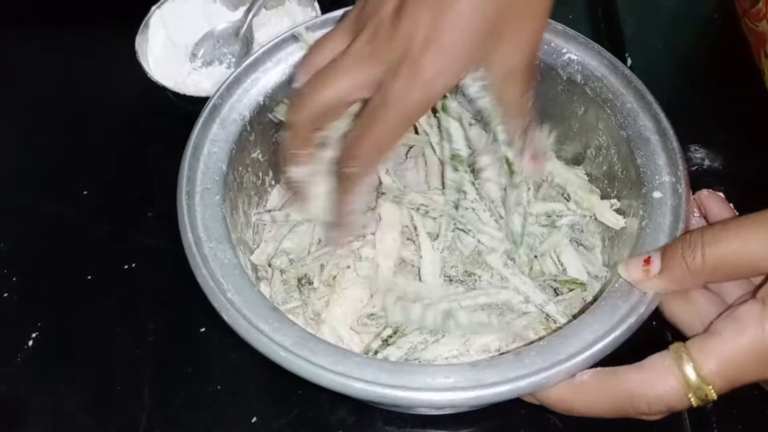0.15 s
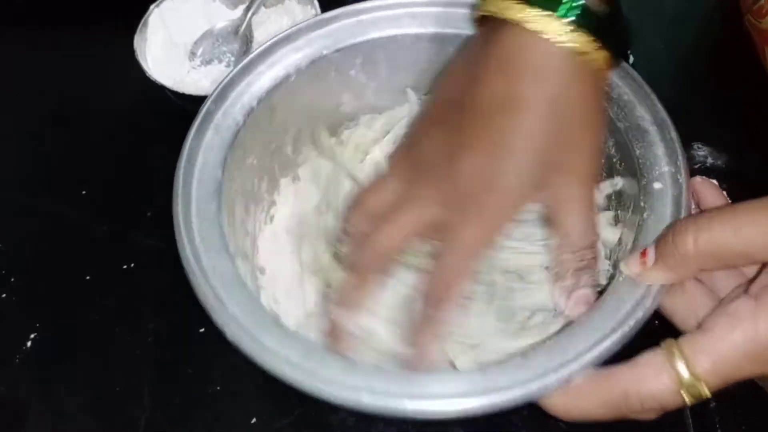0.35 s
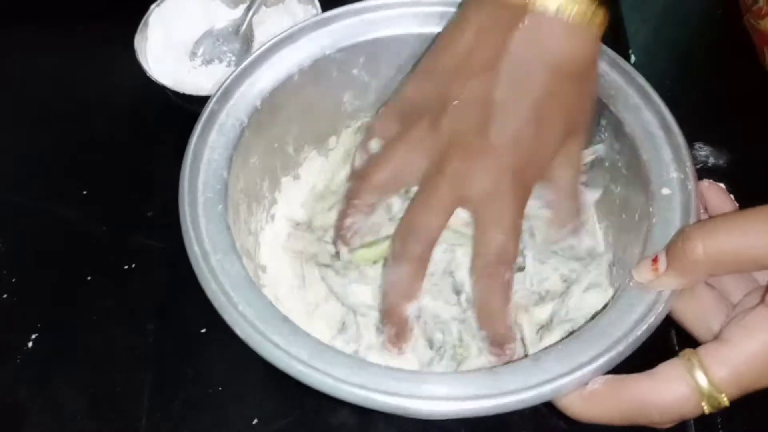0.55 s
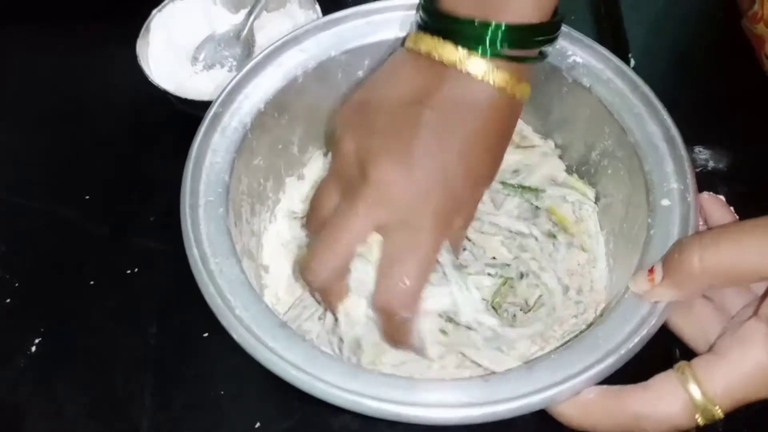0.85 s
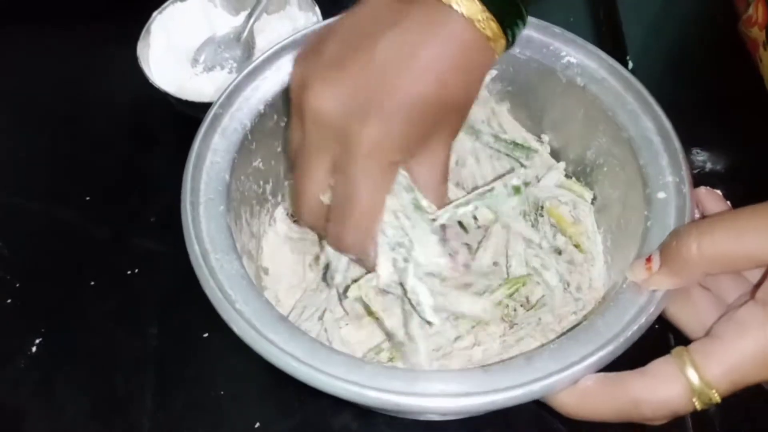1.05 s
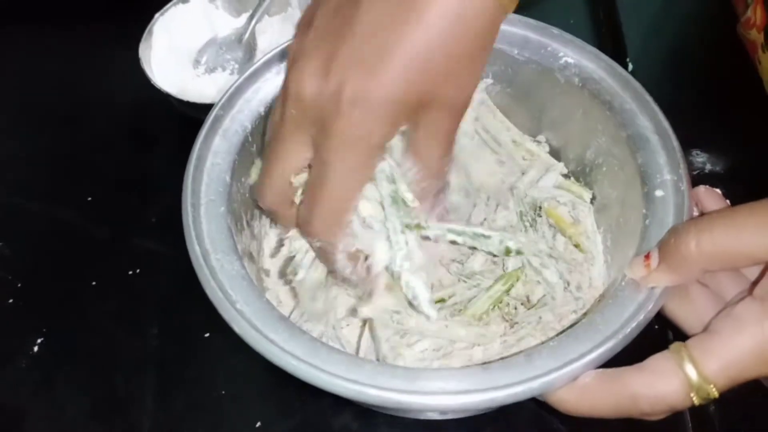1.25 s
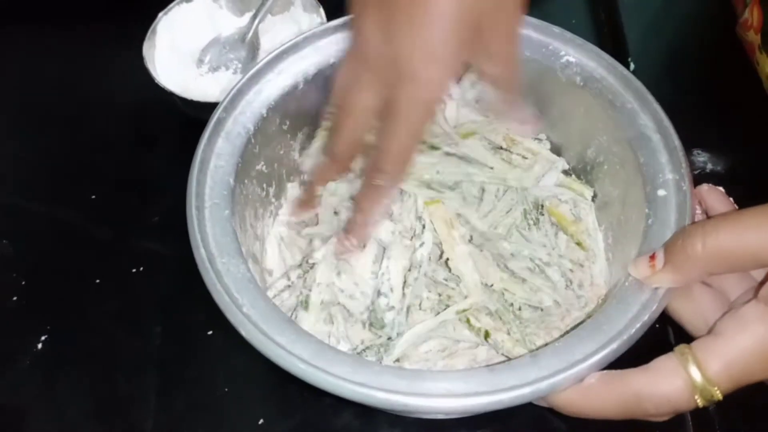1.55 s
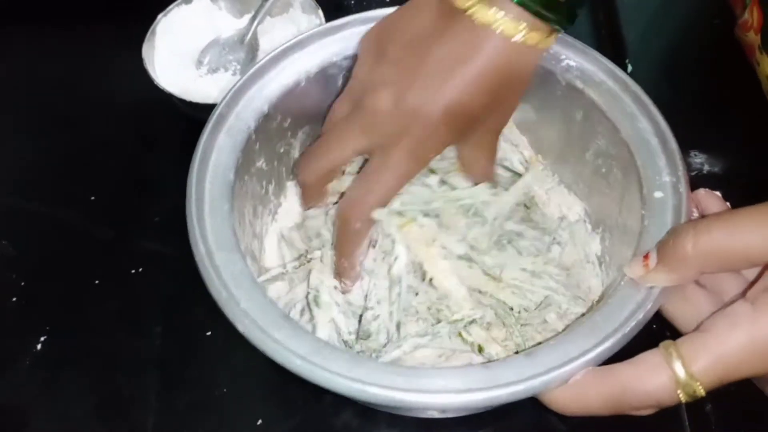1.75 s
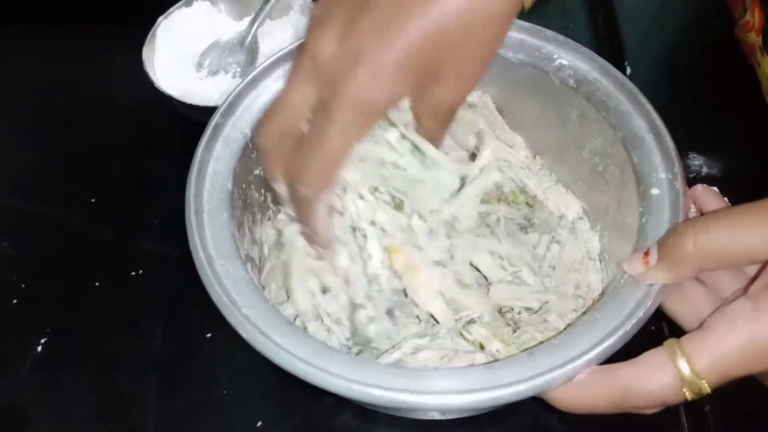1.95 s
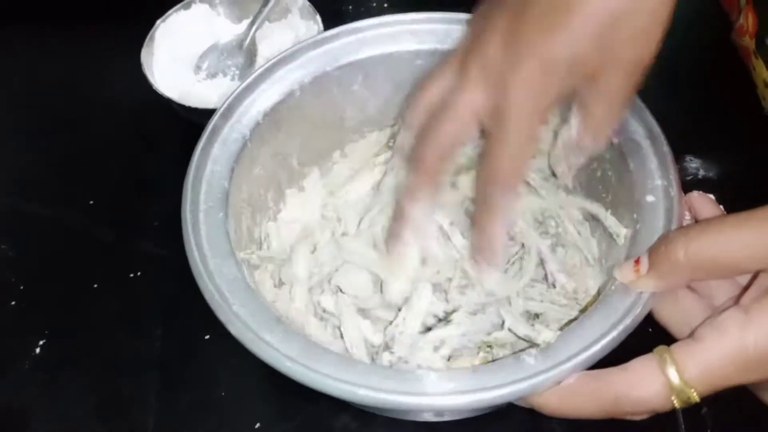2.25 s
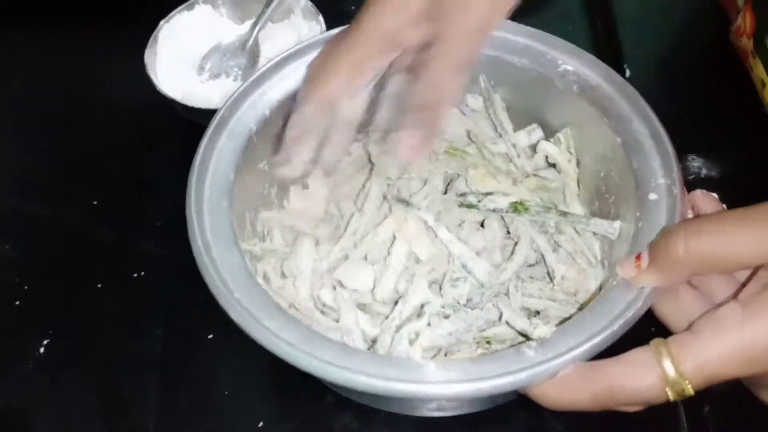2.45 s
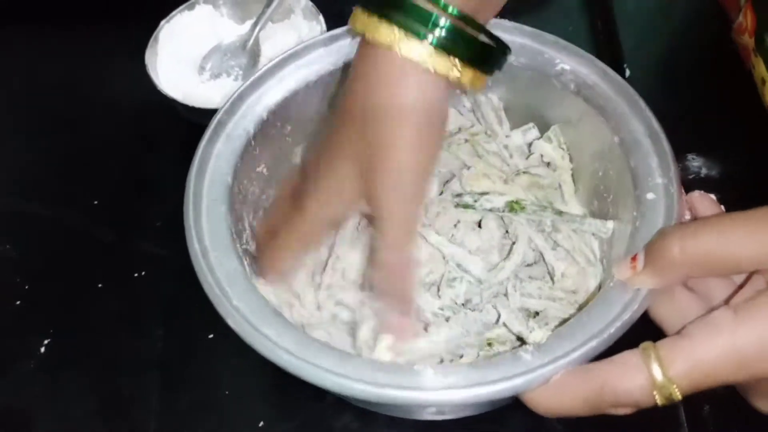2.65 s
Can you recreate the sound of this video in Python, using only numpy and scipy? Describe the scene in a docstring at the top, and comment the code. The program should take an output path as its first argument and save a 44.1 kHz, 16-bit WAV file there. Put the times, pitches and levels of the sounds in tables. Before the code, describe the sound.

A hand turns floured vegetable strips in a metal bowl: gritty rustling and crunching in bursts, sharp damped wall knocks, a brief glass bangle chink, then lighter strokes; close stereo microphones, small hard kitchen, faint hiss.

```python
"""Floured vegetable strips rustle and crunch as a hand turns them in a metal bowl: gritty noise and short
pitched rings, shaped band by band. Nails and bangles knock the bowl wall (noise bursts into damped modes),
glass bangles chink (brief modes), the bowl thuds (low damped overtones), and short tones add bowl rings,
ticks, scrapes and crackles. A small hard room (sparse dying taps) answers the hits, over a faint hiss
(shaped noise) and wavering tone."""
import sys
import numpy as np
from scipy import signal
from scipy.io import wavfile
from scipy.ndimage import uniform_filter1d

SR = 44100
rng = np.random.default_rng(int(sys.argv[2]) if len(sys.argv) > 2 else 0)


def unload_audio(sound):
    """Save the sound as a 16-bit wav file, at the path given as the first command line argument."""
    columns = np.transpose(np.atleast_2d(sound))
    # keep every value between -1 and 1, then stretch to whole-number steps
    steps = np.round(np.clip(columns, -1, 1) * 32767)
    wavfile.write(sys.argv[1], SR, steps.astype(np.int16))


def linear_from_db(decibels):
    """Turn decibels (scalar or array-like) into linear amplitude factors; 0 gives 1."""
    return 10 ** (np.asarray(decibels, float) / 20)


N = 123479  # samples

# Stirring of the strips. Each row: time in seconds, then level in dB of body, crunch, scrape, flour hiss
# and top fizz, the five bands parted by BAND_EDGES_HZ.
STIR_LEVELS = [(0.029, -78, -86, -86, -66, -80), (.055, -75, -65.5, -47, -44.5, -52),
               (0.128, -82, -71, -59, -50.5, -59), (0.157, -68, -52, -50.5, -44.5, -52.5),
               (.24, -58.5, -49, -47, -43, -48.5), (0.383, -54, -58, -53, -53, -58),
               (0.452, -42.5, -37.5, -51, -45, -56), (0.622, -64, -45, -42, -53, -53),
               (0.739, -73, -55, -53, -50, -59), (0.798, -78, -51.5, -49, -53, -40.5),
               (0.981, -83, -94, -79, -67, -79.5), (1.109, -89, -74, -67.5, -66, -78.5),
               (1.22, -78.5, -83.5, -73, -68, -78.5), (1.422, -78, -86.5, -87, -68, -82),
               (1.437, -72.5, -72, -59, -45, -51.5), (1.50, -69, -68.5, -53.5, -52.5, -55),
               (1.604, -47.5, -37.5, -43, -42.5, -51), (1.749, -68, -50, -54.5, -60, -76),
               (1.9, -75, -80.5, -85, -73, -82), (2.016, -98, -94, -76, -65, -83.5),
               (2.028, -66, -62.5, -44, -59, -65), (2.075, -67, -54, -57, -64, -73),
               (2.15, -63, -62.5, -60, -59, -69.5), (2.269, -80, -77.5, -80, -70, -81),
               (2.343, -60, -66, -59.5, -47, -52.5), (2.386, -89, -73, -62, -58.5, -63),
               (2.429, -44, -47, -47, -39, -48), (2.552, -59, -50.5, -49.5, -41.5, -50),
               (2.621, -84, -57.5, -51.5, -45.5, -54), (2.718, -64, -57.5, -57, -55, -61),
               (2.8, -101, -79.5, -73, -63.5, -80)]
# Borders of the stir bands and of the bowl mode groups. Each entry: frequency in Hz.
BAND_EDGES_HZ = [600, 3000, 5300, 8600]
# Rustle spectrum within the bands. Each row: frequency in Hz, relative density in dB per Hz.
RUSTLE_SPECTRUM = [(60, -15.5), (172, -28), (344, -18.5), (516, -44), (709, -11.5), (3390, -11), (6860, 2),
                   (9340, -4), (15500, 0.5), (15900, -51.5)]
# Knocks on the bowl wall. Each row: start in seconds, peak of the high modes in dB, then low modes,
# middle modes and top modes in dB against it.
WALL_KNOCKS = [(0.398, -13, -3.5, 0.5, -16), (0.4036, -16.5, 1.5, -1.5, -20), (.423, -10.5, -20, -10, -32),
               (.481, -12, 2, -5.5, -9.5), (0.5514, -10, -18.5, -11.5, -30), (0.5744, -9.5, -17, -11, -28),
               (0.7522, -12, -10.5, -6.5, -15.5), (.7945, -26, -25, -29, -12.5),
               (1.5245, -18.5, 4.5, 2, -31.5), (1.532, -19, 2, 3, -25), (1.6232, -17.5, -12, -13.5, -20.5),
               (1.6413, -17.5, -7, -5, -21.5), (1.7196, -43, 17, -13, -19)]
# Bowl modes. Each row: frequency in Hz, relative level in dB, t60 in seconds before the LONGEST_RING_S cap.
BOWL_MODES = [(749.6, -1, 0.18), (1178, -10.5, 0.016), (1686, 16, 0.036), (2001, 16, 0.052),
              (2444, 15.5, 0.021), (2735, 9.5, 0.09), (3820, -0.5, 0.067), (4092, 3.5, 0.019),
              (4505, -3, 0.045), (6320, 4, 0.081), (6844, 13.5, 0.0129), (7352, 4.5, 0.03),
              (11520, -5, 0.00607)]
# Bangle chinks. Each row: start in seconds, peak in dB.
BANGLE_CHINKS = [(0.7704, -21.5), (0.776, -32.5), (0.7896, -32), (0.7968, -18.5)]
# Glass modes. Each row: frequency in Hz, relative level in dB, t60 in seconds before the LONGEST_RING_S cap.
GLASS_MODES = [(5990, -5, 0.037), (7140, -18.5, 0.076), (10190, 1, .05), (10500, -9, 0.027),
               (15600, 5, 0.029)]
# Thuds of the bowl and of falling strips. Each row: start in seconds, peak in dB, pitch in Hz,
# t60 of the fundamental in seconds.
SOFT_THUDS = [(0.28, -23, 370, 0.026), (0.399, -31.5, 255.5, 0.093), (0.479, -36, 316, 0.062),
              (1.54, -37, 183, 0.072), (1.689, -61, 149, 0.019), (2.3074, -34.5, 163, 0.045),
              (2.415, -36, 180, 0.051)]
# Thud overtones. Each row: multiple of the pitch, relative level in dB.
OVERTONES = [(1, 0), (1.35, -3), (2.3, -7), (3.5, -14)]
# Short tones: bowl rings, knock and thud tones, ticks, scrapes and crackles. Each row: start in seconds,
# level before edge and wobble in dB, pitch in Hz, t60 in seconds.
SHORT_TONES = [ (0.052, -39, 4170, 0.04), (0.223, -30.5, 2560, 0.025), (0.228, -32, 2960, 0.037),
               (0.277, -29.5, 1200, 0.023), (1.029, -50.5, 780, 0.11), (1.03, -52.5, 532, 0.11),
               (1.066, -62.5, 2130, 0.23), (1.106, -58, 1618, 0.12), (1.324, -53, 2957, 0.08),
               (1.453, -52, 1190, 0.062), (1.72, -50, 435, 0.65), (1.72, -47, 712, 0.5),
               (.753, -33, 1625, .22), (1.04, -63, 2790, .7), (.149, -35, 4420, .035),
               (2.032, -35, 677, 0.053), (2.032, -42.5, 448, 0.059), (2.44, -20.5, 7120, 0.016),
               (2.0203, -26.5, 3400, .016), (2.0205, -31, 3750, .014), (2.0697, -27, 1250, .012),
               (2.0697, -31, 2200, .01), (2.073, -32, 1150, .014), (2.111, -38, 1644, 0.038)]
# Hiss spectrum. Each row: frequency in Hz, relative density in dB per Hz.
HISS_SPECTRUM = [(30, -38.5), (110, -5.5), (270, -25), (622, -34), (1360, -17), (3230, -37.5), (4190, -14),
                 (5170, -38.5), (6210, 1), (7460, -9), (8950, -40.5), (15500, -36.5)]
# Room decay. Each row: frequency in Hz, t60 in seconds.
ROOM_DECAY = [(250, 0.32), (1000, 0.2), (4000, 0.37), (15000, 0.27)]
# Microphone pair balance. Each row: frequency in Hz, left minus right in dB.
LEFT_RIGHT_BALANCE = [(300, 1.5), (1200, 6.5), (3000, 3), (6500, 1.5), (8300, -12), (11000, -15.5),
                      (12500, 1), (15000, -4)]
# Microphone pair likeness. Each row: frequency in Hz, cosine of the rms left-right phase difference.
LEFT_RIGHT_LIKENESS = [(200, 0.74), (5000, 0.74), (9500, 0.37), (15000, 0.22)]

GRAINS_PER_S, GRAIN_DECAY_S, GRAIN_SPREAD_DB = 1100, 0.0058, 5
SMOOTH_SHARE, PATCHY_DB = 0.49, 0.5
CRUNCHES_PER_S, CRUNCH_T60_S, CRUNCH_DB = 45, 0.03, -2.5  # rate for each pitch, level against the grit
WALL_DB, WALL_T60_S = 7, 0.06
MODE_SCATTER_DB, DETUNE, CRACK_DB = 2.5, 0.01, -3
CONTACT_S, RATTLE_S, RATTLE_DB = 0.0008, 0.0047, -4.5
LONGEST_RING_S = 0.034  # the load of strips damps the modes
GLASS_SCATTER_DB, GLASS_ATTACK_S = 4, 0.00054
WOBBLE_S, WOBBLE_DEPTH = 0.02, 0.72
HISS_RMS_DB, HISS_PATCHY_DB = -61, 2.6
WHINE_HZ, WHINE_WIDTH_HZ, WHINE_RMS_DB = 4190, 60, -74
ROOM_DB, ROOM_GAP_S = -7, 0.0043
LOW_CUT_HZ = 144


def evened(x):
    """Scales to an rms of 1."""
    return x / np.sqrt(np.mean(x ** 2) + 1e-20)


def read(points, hz):
    """Reads a table of (Hz, value) along log frequency."""
    f, value = np.transpose(points)
    return np.interp(np.log(hz + 1), np.log(f + 1), value)


def add(mix, start_s, sound):
    """Adds a sound in place, cut at the end of the mix."""
    part = mix[round(start_s * SR):][:len(sound)]
    part += sound[:len(part)]


def peaked(x, db):
    """Scales to a peak in dB."""
    return linear_from_db(db) * x / np.abs(x).max()


def ring(hz, db, t60_s, t):
    """One exponentially dying mode per row."""
    return linear_from_db(db[:, None] - 60 * t / t60_s[:, None]) * np.sin(2 * np.pi * hz[:, None] * t)


def filtered(x, order, hz, kind):
    """Butterworth filter."""
    return signal.sosfilt(signal.butter(order, hz, kind, fs=SR, output="sos"), x)


def patches(shape, bins, frames):
    """A random field over frequency and time with an rms of 1, smoothed over bins and frames."""
    across = uniform_filter1d(rng.standard_normal(shape), bins, 0)
    return evened(uniform_filter1d(across, frames, 1))


def hiss():
    """Shaped noise with a patchy level, plus narrow-band noise heard as a faint wavering tone."""
    hz, _, z = signal.stft(rng.standard_normal(N), SR, nperseg=1024, noverlap=768)
    z = z * linear_from_db(read(HISS_SPECTRUM, hz)[:, None] + HISS_PATCHY_DB * patches(z.shape, 24, 5))
    noise = evened(signal.istft(z, SR, nperseg=1024, noverlap=768)[1][:N])
    band_hz = [WHINE_HZ - WHINE_WIDTH_HZ / 2, WHINE_HZ + WHINE_WIDTH_HZ / 2]
    whine = evened(filtered(rng.standard_normal(N), 2, band_hz, "band"))
    return linear_from_db(HISS_RMS_DB) * noise + linear_from_db(WHINE_RMS_DB) * whine


def room(x):
    """Sparse reflections of random sign, each band dying at its own speed."""
    slots = np.arange(round(ROOM_GAP_S * SR), SR - 20, 20)
    taps = np.zeros(SR)
    taps[slots + rng.integers(0, 20, len(slots))] = rng.choice([-1., 1.], len(slots))
    hz, t, z = signal.stft(taps, SR, nperseg=256)
    z = z * linear_from_db(-60 * t / read(ROOM_DECAY, hz)[:, None])
    tail = signal.istft(z, SR, nperseg=256)[1]
    return signal.fftconvolve(x, tail / np.linalg.norm(tail))[:N]


def short_tones():
    """One soft-edged dying tone each, its strength wobbling at random, which roughens the tone."""
    start_s, level_db, hz, t60_s = np.transpose(SHORT_TONES)
    t, out = np.arange(14000) / SR, np.zeros(N)
    wobble = evened(uniform_filter1d(rng.standard_normal((len(hz), len(t))), int(WOBBLE_S * SR), 1))
    strength = 1 + WOBBLE_DEPTH * wobble * np.minimum(t / WOBBLE_S, 1)
    edge = np.minimum(t / (0.034 * t60_s[:, None]), 1)
    for start, tone in zip(start_s, ring(hz, level_db, t60_s, t) * edge * strength):
        add(out, start, tone)
    return out


def thuds():
    """A soft low push with a few damped overtones, the higher ones dying sooner."""
    times, db = np.transpose(OVERTONES)
    t, out = np.arange(9000) / SR, np.zeros(N)
    for start_s, peak_db, pitch_hz, t60_s in SOFT_THUDS:
        tones = ring(pitch_hz * times, db, t60_s / np.sqrt(times), t).sum(0)
        edge = np.minimum(t * pitch_hz * 2, 1)  # rises over half a period
        add(out, start_s, peaked(tones * edge, peak_db))
    return out


def chinks():
    """Glass bangles touch and ring briefly in a few modes of scattered strength."""
    hz, db, t60_s = np.transpose(GLASS_MODES)
    t, out = np.arange(6000) / SR, np.zeros(N)
    edge = np.minimum(t / GLASS_ATTACK_S, 1)
    for start_s, peak_db in BANGLE_CHINKS:
        scattered_db = db + GLASS_SCATTER_DB * rng.standard_normal(len(hz))
        tones = ring(hz, scattered_db, np.minimum(t60_s, LONGEST_RING_S), t).sum(0)
        add(out, start_s, peaked(tones * edge, peak_db))
    return out


def knocks():
    """A sharp contact and a short rattle shake the bowl modes; each spot favours other groups of modes."""
    hz, db, t60_s = np.transpose(BOWL_MODES)
    group = np.searchsorted(BAND_EDGES_HZ, hz) - 1
    edges_hz = list(BAND_EDGES_HZ) + [16000]
    t, out = np.arange(9000) / SR, np.zeros(N)
    u = t[:900]
    contact = u / CONTACT_S * np.exp(1 - u / CONTACT_S)
    rattle = linear_from_db(RATTLE_DB) * np.exp(-u / RATTLE_S) * np.minimum(u / CONTACT_S, 1)
    for start_s, peak_db, low_db, middle_db, top_db in WALL_KNOCKS:
        touch = rng.standard_normal(len(u)) * (contact + rattle)
        detuned_hz = hz * (1 + DETUNE * rng.standard_normal(len(hz)))
        scattered_db = db + MODE_SCATTER_DB * rng.standard_normal(len(hz))
        modes = ring(detuned_hz, scattered_db, np.minimum(t60_s, LONGEST_RING_S), t)
        for k, group_db in enumerate([low_db, middle_db, 0, top_db]):
            crack = filtered(np.pad(touch, (0, len(t) - 1)), 2, edges_hz[k:k + 2], "band")
            body = signal.oaconvolve(touch, modes[group == k].sum(0))
            add(out, start_s, peaked(peaked(body, 0) + peaked(crack, CRACK_DB), peak_db + group_db))
    return out


def wall(strips):
    """The rustle sets the bowl modes murmuring, all equally strong and equally damped."""
    hz = np.transpose(BOWL_MODES)[0]
    modes = ring(hz, np.zeros(len(hz)), np.full(len(hz), WALL_T60_S), np.arange(9000) / SR).sum(0)
    per_sample = 2 * np.log(1000) / WALL_T60_S / SR  # offsets the build-up of a long ring
    return linear_from_db(WALL_DB) * signal.oaconvolve(strips, modes)[:N] * per_sample


def crunches(count=44):
    """Strips snap and squeak past one another: short rings of many pitches at random moments."""
    place = (np.arange(count) + rng.random(count) + 2) / (count + 2)
    t, out = np.arange(round(CRUNCH_T60_S * SR)) / SR, np.zeros(N)
    for tone in ring(place ** 2 * 15500, 10 * np.log10(place), np.full(count, CRUNCH_T60_S), t):
        chance = rng.random(N) * SR / CRUNCHES_PER_S
        snaps = chance * (chance < 1)  # rare, of even random strength
        out += signal.oaconvolve(snaps, tone)[:N]
    return evened(out)


def rustle():
    """Noise roughened by many tiny crumbs, plus crunches, each band following the stirring."""
    strength = linear_from_db(GRAIN_SPREAD_DB * np.minimum(rng.exponential(1, N), 5))
    crumbs = strength * (rng.random(N) < GRAINS_PER_S / SR)
    lumps = signal.oaconvolve(crumbs, np.exp(-np.arange(400) / SR / GRAIN_DECAY_S))[:N]
    roughness = SMOOTH_SHARE + (1 - SMOOTH_SHARE) * evened(lumps)
    grit = evened(rng.standard_normal(N) * roughness) + linear_from_db(CRUNCH_DB) * crunches()
    hz, t, z = signal.stft(evened(grit), SR, nperseg=256, noverlap=192)
    band = np.searchsorted(BAND_EDGES_HZ, hz)
    shape = linear_from_db(read(RUSTLE_SPECTRUM, hz))
    band_rms = np.sqrt(np.bincount(band, shape ** 2) / len(hz))
    stir_s, *stir_db = np.array(STIR_LEVELS).T
    level_db = np.array([np.interp(t, stir_s, db) for db in stir_db])[band]
    level_db = level_db - 20 * np.log10(band_rms[band, None])
    level_db = uniform_filter1d(level_db, size=3, axis=0)  # softens the band borders
    level_db = level_db + PATCHY_DB * patches(z.shape, 12, 18)
    return signal.istft(z * shape[:, None] * linear_from_db(level_db), SR, nperseg=256, noverlap=192)[1][:N]


def scene():
    """Sums the layers; the room answers the hits, and the low cut spares chinks and hiss."""
    strips = rustle()
    hits = filtered(knocks(), 4, BAND_EDGES_HZ[0], "high") + thuds() + short_tones()
    bowl = hits + linear_from_db(ROOM_DB) * room(hits) + strips + wall(strips)
    mono = filtered(bowl, 2, LOW_CUT_HZ, "high") + chinks() + hiss()
    return np.array([mono] * 2)


def roll_off(x):
    """The treble ends steeply here."""
    return signal.sosfilt(signal.butter(12, 16650, fs=SR, output="sos"), x)


def record(dry):
    """Two close microphones lean left or right by frequency and differ randomly in phase."""
    hz, _, z = signal.stft(dry, SR, nperseg=256, noverlap=192)
    lean = linear_from_db(read(LEFT_RIGHT_BALANCE, hz))[:, None]
    angle = np.arccos(np.clip(read(LEFT_RIGHT_LIKENESS, hz), 0, 1))[:, None]
    turn = np.exp(0.5j * angle * patches(z[0].shape, 1, 1))
    pair = np.array([z[0] * lean * turn, z[1] / turn]) * 2 / (1 + lean)
    mix = signal.istft(pair, SR, nperseg=256, noverlap=192)[1][:, :N]
    return roll_off(mix)


dry = scene()
out = record(dry)
unload_audio(out)
```